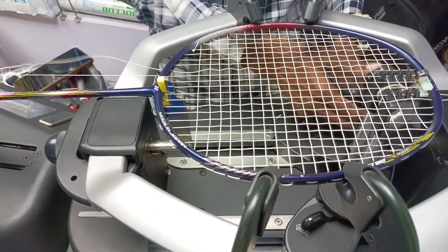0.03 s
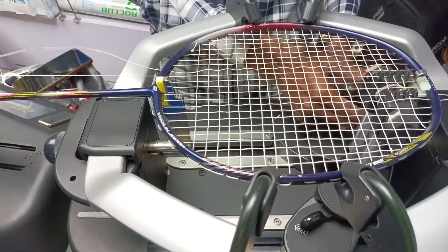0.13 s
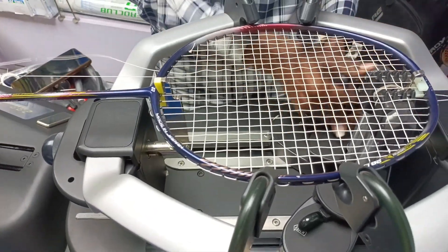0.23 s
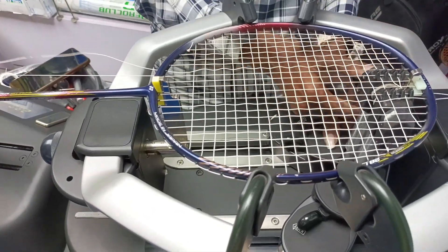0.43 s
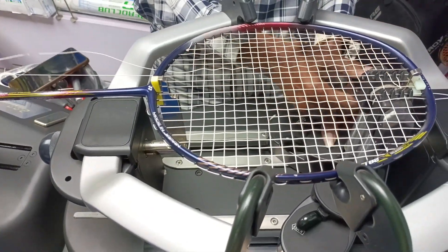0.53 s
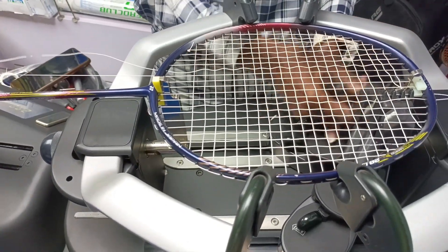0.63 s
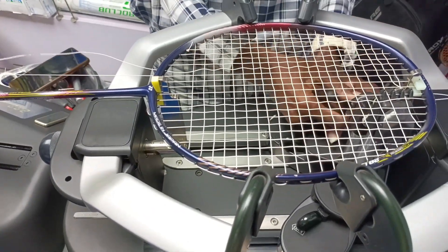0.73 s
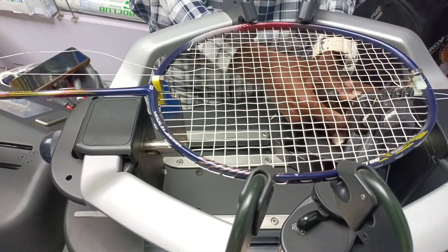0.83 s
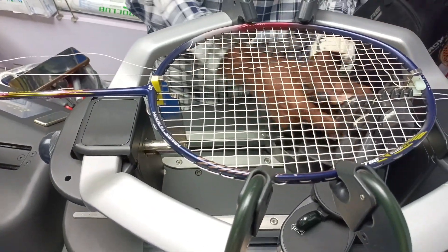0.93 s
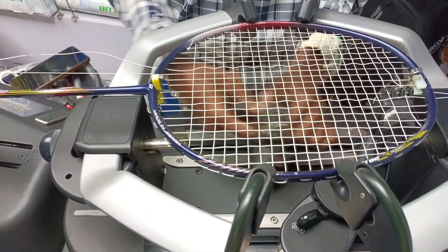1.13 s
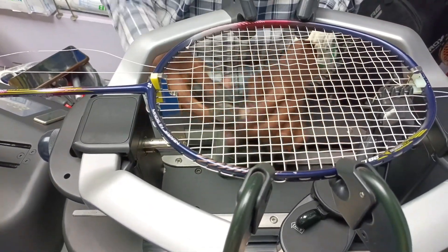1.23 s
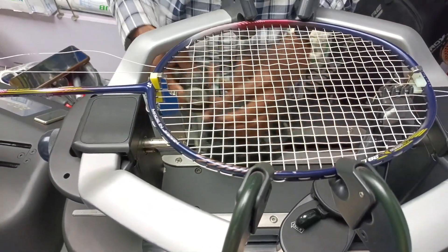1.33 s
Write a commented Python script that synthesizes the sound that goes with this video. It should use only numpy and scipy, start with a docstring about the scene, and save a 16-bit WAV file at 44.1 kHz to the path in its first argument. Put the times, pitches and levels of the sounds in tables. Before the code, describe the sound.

Sharp clicks and clacks of a string clamp as a badminton racket is strung.

```python
"""A badminton racket is strung on a machine in a small, dry room, close to a stereo microphone.
Over room air and a quiet hum come a tap on the frame, a dull knock and, twice, a faint whine.
A string clamp snaps open and shut, its base lever locks, and the clamp rattles along its rail.
Last, hands and tools knock on the strung frame.
Each contact is a sharp click, a short rattle of the parts, a faint ring and a room tail."""
import sys
import numpy as np
from scipy import signal
from scipy.fft import rfft, irfft
from scipy.io import wavfile

SR = 44100
rng = np.random.default_rng(int(sys.argv[2]) if len(sys.argv) > 2 else 0)


def int16_out(signal):
    """Quantize to a 16-bit WAV file."""
    q = np.round(np.clip(np.atleast_2d(signal).T, -1, 1) * 32767)
    wavfile.write(sys.argv[1], SR, q.astype(np.int16))


N = 61739
LENGTH = 16384  # samples in one contact or filter response

# Resonances of the machine's body: f/Hz, level/dB, t60/s
MACHINE_MODES = [(338, -20, .16), (516, -22, .3), (1575, -21, .15)]
# Spectrum of the rail and of the dull knock: f/Hz, level/dB
RAIL_COLOUR = [(120, -13.5), (305, 0.5), (428, -20.5), (520, 3), (950, -11), (1850, -4), (2400, -12),
               (3380, -5), (4290, -15), (8950, -23.5), (15000, -40)]


def from_db(db):
    """Decibels to gain."""
    return 10 ** (np.asarray(db) / 20)


def at_hz(points, hz):
    """Read a table on a log-frequency axis."""
    f, value = np.transpose(points)
    return np.interp(np.log(np.maximum(hz, 1)), np.log(f), value)


def bins(size):
    """Frequencies of a spectrum."""
    return np.arange(size // 2 + 1) * SR / size


def unit(x):
    """Scale to a mean energy of one per channel."""
    return x / np.sqrt(np.mean(np.sum(x ** 2, axis=-1)) + 1e-20)


def causal(gain):
    """Minimum-phase response with this gain: nothing sounds early."""
    cepstrum = irfft(np.log(gain + 1e-9))
    cepstrum[1:LENGTH // 2] *= 2
    cepstrum[LENGTH // 2 + 1:] = 0
    return np.exp(rfft(cepstrum))


def diffuse(size):
    """Spectrum of noise at the microphone: both sides alike in the bass, unrelated in the treble."""
    # f/Hz, left-right correlation
    likeness = [(100, 0.98), (450, 0.8), (1000, 0.029)]
    alike = at_hz(likeness, bins(size))
    mid, side = rfft(rng.standard_normal((2, size)))
    return np.sqrt(1 + alike) * mid + np.sqrt(1 - alike) * side * [[1], [-1]]


def room_tone(air_db=-54.5, hum_db=-62, hum_hz=134.9):
    """Air all round the microphone and a low, wavering hum in the centre."""
    # Spectrum of the air: f/Hz, relative level/dB
    air_colour = [(13, -31), (22, 4), (179, -8.5), (600, -15), (1050, -23.5), (3710, -20.5), (5770, -41.5),
                  (8720, -28.5), (10500, -41.5), (16000, -49)]
    size, t = 4 * LENGTH, np.arange(N) / SR
    air = irfft(diffuse(size) * from_db(at_hz(air_colour, bins(size))))[:, :N]
    waver = np.interp(t, np.linspace(0, N / SR, 14), rng.standard_normal(14))
    hum = np.sqrt(2) * np.sin(2 * np.pi * hum_hz * t) * (1 + 0.17 * waver)
    return from_db(air_db) * unit(air) * np.sqrt(N) + from_db(hum_db) * hum


def whine(pitch_hz=346, fade_s=0.01):
    """A faint, steady-pitched whine comes twice, perhaps from the tensioning motor."""
    # Spells of whining: start/s, end/s, level/dB
    spells = [(0.058, 0.143, -63.5), (0.19, 0.263, -60)]
    # Harmonics five to seven: relative level/dB
    harmonics = [-1.5, -7, -1]
    t = np.arange(N) / SR
    level = sum(from_db(db) * np.clip(np.minimum(t - start, end - t) / fade_s, 0, 1)
                for start, end, db in spells)
    tone = sum(from_db(db) * np.sin(2 * np.pi * k * pitch_hz * t) for k, db in enumerate(harmonics, 5))
    return level * np.sqrt(2) * tone


def room_tail(build_s=0.0055):
    """Spectrum of dense reflections off near walls: they build up and die, the bass last."""
    # Reverberation time by band: f/Hz, t60/s
    decays = [(150, 0.26), (400, 0.17), (3000, 0.15), (15000, 0.15)]
    centres, t60s = np.transpose(decays)
    t, noise, tail = np.arange(LENGTH) / SR, diffuse(LENGTH), 0
    for one_band, t60 in zip(np.eye(len(centres)), t60s):
        weight = at_hz(list(zip(centres, one_band)), bins(LENGTH))
        envelope = from_db(-60 * t / t60) * (1 - np.exp(-t / build_s))
        tail += irfft(noise * weight) * envelope
    return rfft(unit(tail))


def ring(modes):
    """Spectra of a struck body's decaying modes, one row each."""
    t = np.arange(LENGTH) / SR
    return rfft([from_db(db) * unit(np.sin(2 * np.pi * hz * t) * from_db(-60 * t / t60))
                 for hz, db, t60 in modes])


def contacts(hits, colour, modes, ring_db, rattle_db, rattle_s, ping_hz):
    """Hard parts meet: a click with a brief rattle and a resonant ping, then the ring and the room."""
    bass_hz, treble_hz, low_cut_hz = 897, 5230, 350
    ping_octaves, rise_s = 0.12, 0.00037
    t, hz = np.arange(LENGTH) / SR, bins(LENGTH)
    body = from_db(at_hz(colour, hz))
    body *= hz ** 2 / (hz ** 2 + (colour[0][0] / 2) ** 2)  # rolls off below the lowest point
    body = causal(body / np.sqrt(np.mean(body ** 2)))
    ping_shape = 1 / (1 + (np.log2((hz + 1) / ping_hz) / ping_octaves) ** 2) - .5
    radiation = hz / np.hypot(hz, low_cut_hz)  # small parts radiate little bass directly
    bass_shelf = 1 / (1 + (hz / bass_hz) ** 4)
    treble_shelf = 1 - 1 / (1 + (hz / treble_hz) ** 8)
    rattle_envelope = (1 - np.exp(-t / rise_s)) * np.exp(-t / rattle_s)
    rattle_gain, rings = from_db(rattle_db), ring(modes)
    out = np.zeros((2, N + LENGTH))
    for start_s, click_db, tail_db, bass_db, treble_db, ping_db in hits:
        rattle = rattle_gain * rfft(unit(irfft(diffuse(LENGTH)) * rattle_envelope))
        ping = causal(from_db(ping_db * ping_shape) * radiation)
        click = from_db(click_db) * (1 + rattle) / np.hypot(1, rattle_gain) * ping * body
        ringing = from_db(ring_db + 2 * rng.standard_normal(len(modes))) @ rings
        tail = from_db(tail_db) * (room_tail() * body + ringing)
        shelves = causal(from_db(bass_db * bass_shelf + treble_db * treble_shelf))
        start = int(start_s * SR)
        out[:, start:start + LENGTH] += irfft((click + tail) * shelves)
    return out[:, :N]


def dull_knock():
    """One dull knock, nearly all rattle, with a midrange ring."""
    # t/s, click/dB, tail/dB, bass/dB, treble/dB, ping/dB
    hits = [(.0295, -9.5, -19, 7.2, -17, 19)]
    # Its resonances: f/Hz, level/dB, t60/s
    modes = [(676, -4, 0.34), (1270, -4.5, 0.18), (2120, -14, .13)]
    return contacts(hits, RAIL_COLOUR, modes, ring_db=1, rattle_db=18, rattle_s=0.009, ping_hz=1182)


def frame_knocks():
    """Hands and tools knock on the frame, and the strung racket rings."""
    # t/s, click/dB, tail/dB, bass/dB, treble/dB, ping/dB
    hits = [(.003, -12.5, -18.5, 14, -2.5, 8.5), (1.063, -27, -26.5, -8, 8.5, 13),
            (1.1113, -4, -13, 1, 0.5, 2), (1.116, -8.5, -7.5, 8, 10, 5), (1.120, 3, -7, -3, 5.5, 8.5),
            (1.2335, -18, -20.5, -24, 18, 14.5), (1.2422, -10, -14, 6, 0, 2.5),
            (1.384, -17, -35, 13.5, 4, 3.5), (1.3968, -6.5, -40, -23, 1, 9.5)]
    # Spectrum of a knock: f/Hz, level/dB
    colour = [(150, -27.5), (300, -17), (852, -16.5), (1580, -4.5), (2430, -7), (3890, -2), (4600, -18),
              (15000, -38)]
    # Racket resonances: f/Hz, level/dB, t60/s
    modes = [(393.4, -17.5, 0.54), (1192, -18.5, 0.227), (1622, -31, 0.08), (1835, -9, 0.13),
             (2020, -10, 0.25), (4043, -13.5, 0.22)]
    return contacts(hits, colour, modes, ring_db=-1, rattle_db=8.5, rattle_s=0.0091, ping_hz=3830)


def rail_rattle():
    """The clamp rattles along its rail and sets the machine ringing."""
    # t/s, click/dB, tail/dB, bass/dB, treble/dB, ping/dB
    hits = [(.8955, -5.5, -6.5, -7.5, -5.5, 11.5), (.9095, -5, -12.5, -1, -8.5, 4),
            (.9225, -2.5, -4, -7.5, -1.5, 15), (.9280, -5, -12, -14, 2.8, 13.5),
            (.9456, -2.5, -9.5, 2.5, -2.5, 2.5)]
    return contacts(hits, RAIL_COLOUR, MACHINE_MODES,
                    ring_db=3.5, rattle_db=9, rattle_s=0.0078, ping_hz=3380)


def base_lever():
    """The clamp's base lever ticks, then locks with one hard click."""
    # t/s, click/dB, tail/dB, bass/dB, treble/dB, ping/dB
    hits = [(.5672, -12.5, -17.5, 1.5, -4.5, 9.5), (.6578, -4, -5.5, -11, -9, 5),
            (.6725, -7, -5, 2, -10, -2), (.6987, -10, -6, -2.5, 12.5, 1), (.7007, 11, 5, -2.5, -3.5, 14.5)]
    # Spectrum of a click: f/Hz, level/dB
    colour = [(130, -17), (300, -7.5), (420, -15.5), (612, -8), (1800, -5), (2360, -6), (3590, -1.5),
              (6140, -22.5), (8700, -22), (15000, -34)]
    return contacts(hits, colour, MACHINE_MODES,
                    ring_db=5.5, rattle_db=1, rattle_s=0.00051, ping_hz=3300)


def string_clamp():
    """The clamp snaps open, then shut: two clusters of clicks that ring both clamp and machine."""
    # t/s, click/dB, tail/dB, bass/dB, treble/dB, ping/dB
    open_hits = [(.2450, 0.5, -12.5, -4, -4, 8.5), (.2481, 7.5, 3.5, -8, 2.5, 2.5),
                 (.2506, 11.5, 4.5, 0.5, 5.5, 11), (.2571, 11, 4, 0, 1, 14.5),
                 (.2908, 1, -4.5, 7.5, -8.5, -0.5)]
    shut_hits = [(.396, -24.5, -15.5, -8.5, -13, -15), (.4129, 2, -11, 0, -5, 2),
                 (.4151, 1.5, 6, -1.5, 2, -8.5), (.4198, -2, -18.5, -22.5, 6, -8),
                 (.430, -9.5, -16.5, 12, -27.5, -5.5), (.4331, 10, 3.5, 4, 3.5, 3)]
    # Spectrum of each snap: f/Hz, level/dB
    open_colour = [(200, -32.5), (345, -10.5), (400, -17), (1080, -13.5), (1330, -8.5), (2100, -11.5),
                   (3230, -3.5), (4600, -12), (5500, -7.5), (6600, -23.5), (8600, -11.5), (10500, -23.5),
                   (15500, -23)]
    shut_colour = [(170, -29), (322, -7.5), (410, -35), (520, -9), (980, -15.5), (1600, -7.5),
                   (2480, -15.5), (3750, 0), (5770, -25.5), (8870, -10.5), (11100, -26.5), (15000, -32)]
    # Clamp resonances: f/Hz, level/dB, t60/s
    clamp_modes = [(2745, -18, .17), (2902, -18, .15), (3547, -15, .11), (3892, -15, .11), (4171, -17, .12),
                   (8690, -19, .1)]
    modes = MACHINE_MODES + clamp_modes
    opening = contacts(open_hits, open_colour, modes,
                       ring_db=-0.5, rattle_db=4, rattle_s=0.0014, ping_hz=4000)
    shutting = contacts(shut_hits, shut_colour, modes,
                        ring_db=2.5, rattle_db=3, rattle_s=0.0019, ping_hz=3680)
    return opening + shutting


def scene():
    """The stringing work over the room tone, as it reaches the microphone."""
    work = string_clamp() + base_lever() + rail_rattle() + frame_knocks() + dull_knock()
    return work + whine() + room_tone()


def record(dry, ceiling=0.95, stop_hz=16900):
    """The microphone's right port favours presence, its left treble; peaks are rounded, the top cut."""
    # Port balance: f/Hz, left minus right/dB
    balance = [(120, -1.2), (400, 0.5), (1220, -2), (2010, 0), (3330, -10.5), (5500, -1), (8500, 14.5),
               (15000, 16.5)]
    ratio = from_db(at_hz(balance, bins(LENGTH)))
    right = np.sqrt(2 / (1 + ratio ** 2))  # keeps the summed power constant
    ports = np.array([irfft(causal(gain)) for gain in (ratio * right, right)])
    heard = signal.fftconvolve(dry, ports, axes=1)[:, :N]
    rounded = ceiling * np.tanh(heard / ceiling)
    return signal.sosfilt(signal.cheby2(14, 70, stop_hz, fs=SR, output="sos"), rounded)


dry = scene()
out = record(dry)
int16_out(out)
```